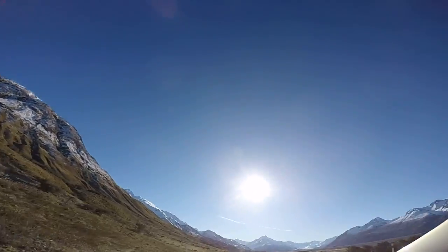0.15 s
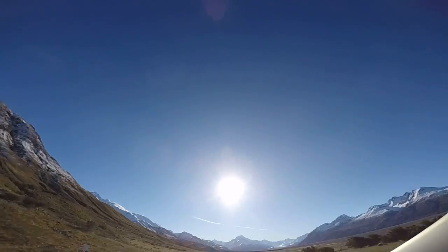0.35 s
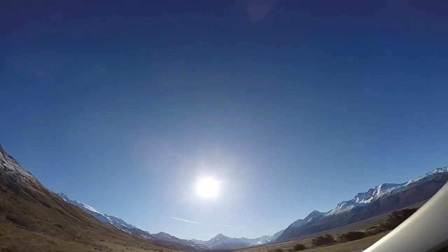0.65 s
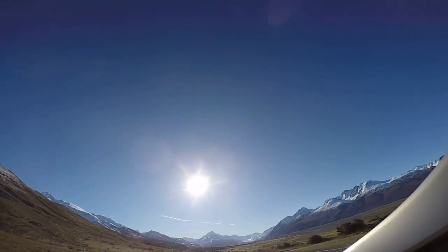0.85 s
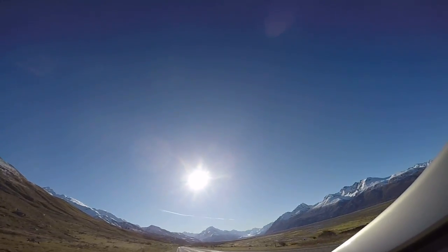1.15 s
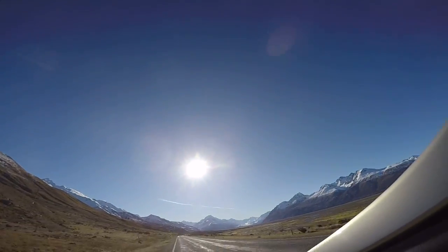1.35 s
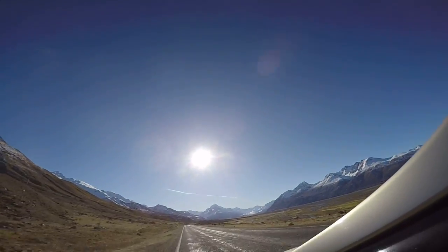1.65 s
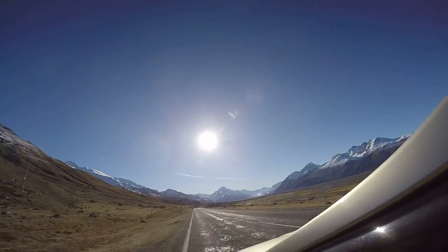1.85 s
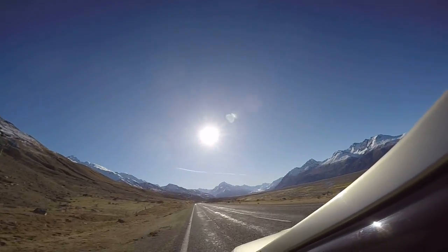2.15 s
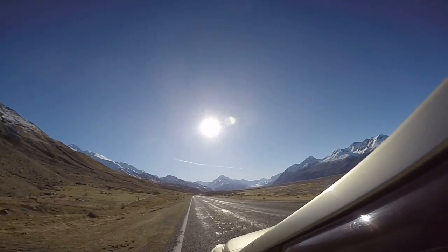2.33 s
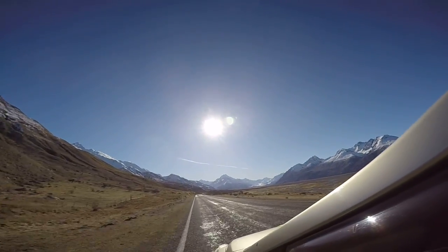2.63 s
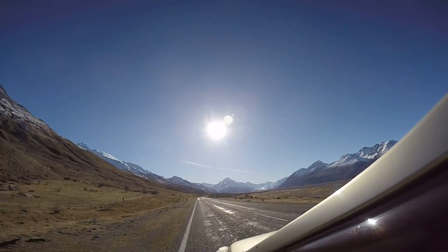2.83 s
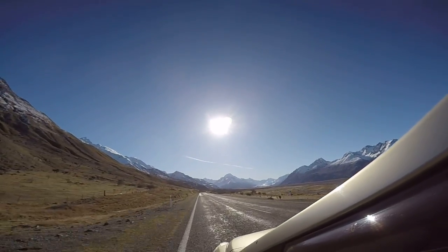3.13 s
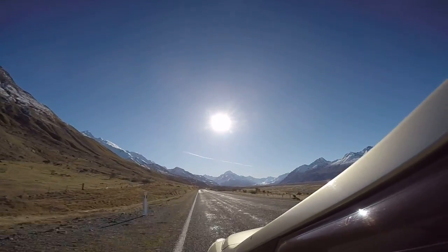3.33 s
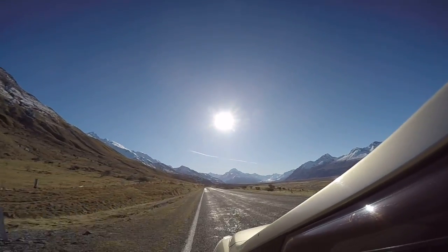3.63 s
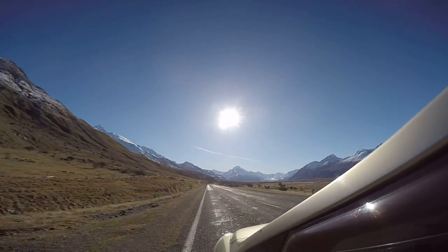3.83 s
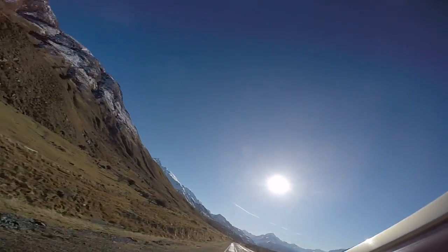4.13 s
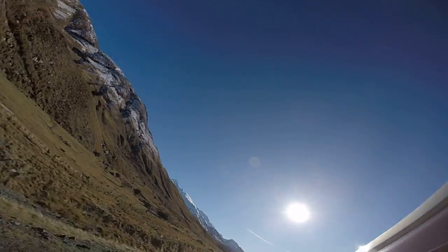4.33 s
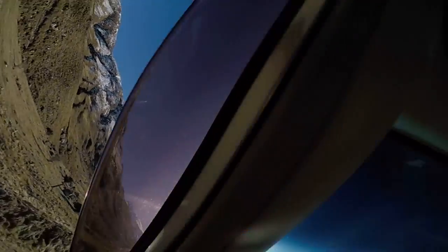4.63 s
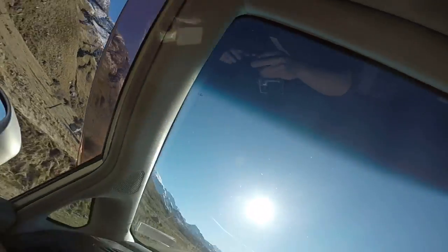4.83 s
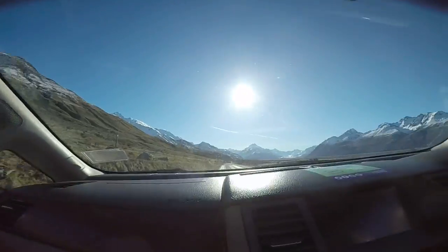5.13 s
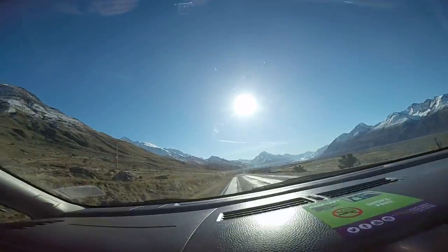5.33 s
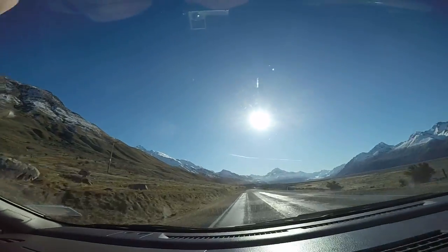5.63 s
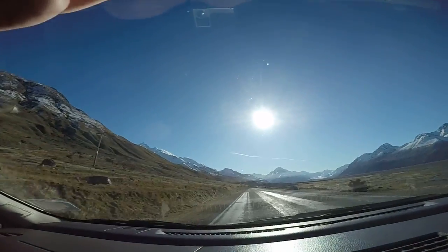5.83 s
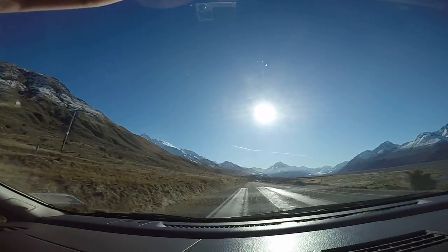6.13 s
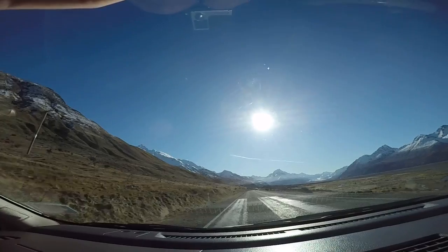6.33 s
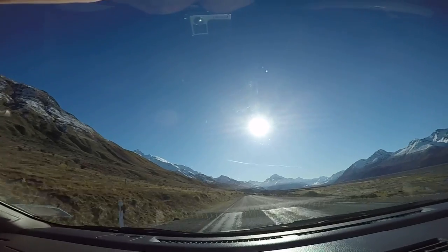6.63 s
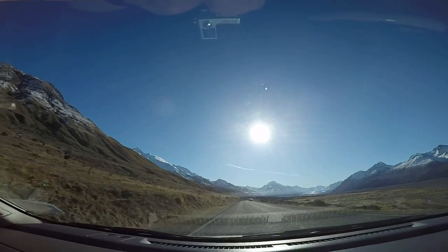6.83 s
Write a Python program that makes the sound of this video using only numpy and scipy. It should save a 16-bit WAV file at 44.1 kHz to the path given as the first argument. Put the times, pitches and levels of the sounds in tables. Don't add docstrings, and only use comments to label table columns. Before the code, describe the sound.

From 0 to 4.5 seconds, strong wind strikes a small microphone outside a moving car. It swells within the first half second into deep, uneven buffeting, a fluttering low-mid roar and a hiss coloured by the plastic housing, with faint airy fizz on top. Hard, short thumps land around 0.45, 0.8, 1.0, 1.65, 1.95 and 2.4. The wind eases near 4.15, then a heavy low slap hits at 4.37 with quick scuffs against the window frame until 4.5. The wind collapses almost instantly. Inside, it is far quieter: a lumpy body boom and dull tyre rumble, slowly lifted, with a very thin rush. Small plastic creaks come at 4.7, a hard snap at 4.94, more creaks around 5.7 to 5.85 and 6.3, stronger knocks at 6.8 to 6.87, and a soft deep thud just before 7.

```python
import sys
import numpy as np
from scipy import signal
from scipy.fft import rfft, irfft, next_fast_len
from scipy.io import wavfile
from scipy.ndimage import uniform_filter1d

SR = 44100
rng = np.random.default_rng(int(sys.argv[2]) if len(sys.argv) > 2 else 0)


def undo_db(level):
    steps = np.asarray(level, float) / 20
    return 10 ** steps


def generate_wav(sig):
    pcm = np.round(np.clip(np.atleast_2d(sig).T, -1, 1) * 32767).astype(np.int16)
    wavfile.write(sys.argv[1], SR, pcm)


N = 307377
SIZE = next_fast_len(N)
HZ = np.fft.rfftfreq(SIZE, 1 / SR)


def evened(x):
    return x / np.sqrt(np.mean(x ** 2) + 1e-20)


def filtered(x, gain):
    return irfft(rfft(x, SIZE) * gain, SIZE)[:N]


def tilted(x, tilt_db, split_hz, order=4):
    low = filtered(x, 1 / (1 + (HZ / split_hz) ** order))
    return low * undo_db(-tilt_db) + (x - low) * undo_db(tilt_db)


def steadied(x, share, seconds):
    power = uniform_filter1d(x ** 2, size=int(seconds * SR))
    return evened(x / (abs(power) + 0.02) ** (share / 2))


def curve(rows):
    s, *columns = np.transpose(rows)
    return [np.interp(np.arange(N) / SR, s, c) for c in columns]


def swells(rows):
    t = np.arange(N) / SR
    return sum(db * np.exp(-((t - s) / half_s) ** 2) for s, db, half_s in rows)


def drift(top_hz):
    shape = (HZ > 2) / np.sqrt(HZ + 1) / (1 + (HZ / top_hz) ** 4)
    return evened(filtered(rng.standard_normal(N), shape))


def slope(points):
    f, db = np.transpose(points)
    return lambda hz: undo_db(np.interp(np.log(hz + 1), np.log(f + 1), db, -120, -120))


def peaks(modes):
    def gain(hz):
        return np.sqrt(sum(undo_db(2 * db) / (1 + (2 * (hz - f) / width_hz) ** 2) ** 1.17
                           for f, width_hz, db in modes))
    return gain


def turbulence(colour, patchy_db, size):
    frames, bins = 4 * N // size + 5, size // 2 + 1
    a, b, patches = rng.standard_normal((frames, bins, 3)).T
    patches = uniform_filter1d(patches, size=5, axis=0)
    patches = evened(uniform_filter1d(patches, size=8, axis=1))
    spectra = (a + 1j * b) * undo_db(patchy_db * patches)
    x = signal.istft(spectra, nperseg=size, noverlap=3 * size // 4)[1][:N]
    return evened(filtered(x, colour(HZ)))


def add(mix, s, db, sound):
    part = mix[round(s * SR):][:len(sound)]
    part += undo_db(db) * (sound / abs(sound).max())[:len(part)]


# (time [s], port pressure [dB], housing speed [dB],
# turn of lens side into stream [-1..1])
STREAM = [(0.0, -27, -46, 1), (0.16, -20, -41, 0.084), (0.34, -21, -38.5, .4), (0.45, -14, -37.5, 0.52),
          (0.9, -15, -35.5, 0.73), (1.47, -14.5, -33, 0.52), (1.75, -15, -32.5, .3),
          (2.05, -14, -32.5, -0.46), (2.5, -14.5, -35, -0.24), (3.02, -13.5, -32.5, -.3),
          (3.25, -14.5, -34.5, -0.42), (3.55, -15, -34, -.4), (3.9, -14.5, -35, -.3),
          (4.15, -20.5, -39.5, -.1), (4.33, -16.5, -40, .5), (4.39, -11, -44, 0.087),
          (4.45, -12.5, -41, -.6), (4.52, -15.5, -46, -0.12)]
# (time [s], level [dB], half length [s])
GUSTS = [(.2, 2, .02), (.24, 1, 0.029), (.87, -2.5, 0.024), (1.94, 2, .04), (2.32, 6, 0.041),
         (2.54, -5.5, 0.029), (2.94, 6.5, 0.024), (2.98, -7, 0.027), (3.49, -1, 0.042), (3.99, 4, .04),
         (4.14, -7, 0.028), (4.3, 4, 0.17), (4.46, 3, 0.028)]
# (time [s], level [dB], half length [s])
WHISTLES = [
    (1.9, 3, 0.34),
    (3.0, 1, .15),
    (4.33, 2, .06),
    (4.46, -6.5, 0.068),
]
# (frequency [Hz], density [dB/Hz])
BUFFET = [(8.8, -40), (15, -3), (43, 0.5), (81, -1), (160, -14), (210, -49), (350, -120)]
# (frequency [Hz], density [dB/Hz])
ROAR = [(59, -17), (100, -9.5), (151, -4), (320, -1.5), (395, -2.5), (478, -6.5), (873, -29), (1100, -31),
        (1430, -46.5), (2420, -120)]
# (frequency [Hz], width [Hz], level [dB])
HOUSING = [(1100, 640, 1), (1900, 340, -3), (2430, 490, 2.5), (2950, 420, 0.5), (3645, 410, -0.5),
           (4700, 740, -4), (5520, 1040, -10.5), (6860, 690, -10)]
# (frequency [Hz], width [Hz], level [dB])
EDGE = [(9590, 1200, -2.5), (10980, 1500, -5.5), (12500, 1200, -3.5), (13600, 2500, -4)]


def wind():
    pull_s, pull_db_per_s, hiss_loss_db_per_s, fizz_loss_db_per_s = 4.51, -180, -125, -135
    fade_in_s, fade_in_db = 0.039, -26
    breakup_s, breakup_rise_s, breakup_db = 4.3, 0.1, 1.2
    t = np.arange(N) / SR
    pressure_db, speed_db, turn = curve(STREAM)
    away_s = np.maximum(t - pull_s, 0)

    start_db = fade_in_db * np.maximum(1 - t / fade_in_s, 0)
    buffet_db = -14 + start_db + swells(GUSTS) + pull_db_per_s * away_s
    roar_db = pressure_db + pull_db_per_s * away_s
    tilt_db = -0.9 + 0.14 * (pressure_db + 15.5)
    hiss_db = speed_db + hiss_loss_db_per_s * away_s
    fizz_db = -50.5 + 0.44 * (speed_db + 33.5) + turn + swells(WHISTLES) + fizz_loss_db_per_s * away_s
    flap_db = breakup_db * np.clip((t - breakup_s) / breakup_rise_s, 0, 1) * np.exp(-away_s / 0.08)

    gust, flutter = drift(90), drift(150)
    flaps = evened(flutter - uniform_filter1d(flutter, size=1500))
    buffet = steadied(turbulence(slope(BUFFET), 0.075, size=2048), 0.3, 0.054)
    roar = turbulence(slope(ROAR), 0.27, size=1024) * undo_db(1.46 * gust + 1.2 * buffet)
    hiss = turbulence(peaks(HOUSING), 0.45, size=256)
    hiss = hiss * undo_db(0.36 * gust + 0.43 * flutter + flap_db * flaps)
    fizz = turbulence(peaks(EDGE), 0.68, size=256) * undo_db(0.6 * flutter + 0.58 * drift(70))

    layers = undo_db(buffet_db) * buffet
    layers = layers + undo_db(roar_db) * tilted(evened(roar), tilt_db, 285)
    layers = layers + undo_db(hiss_db) * tilted(evened(hiss), 3.5 * turn, 3530)
    return layers + undo_db(fizz_db) * evened(fizz)


# (time [s], peak [dB], ring [Hz])
SLAPS = [
    (0.13, -28.5, 490),
    (0.45, -14, 537),
    (0.793, -11, 576),
    (0.878, -26.5, 474),
    (1.014, -12, 516),
    (1.642, -14, 533),
    (1.951, -14.5, 536),
    (2.431, -16, 545),
    (2.695, -20.5, 611),
         (4.2715, -14, 480),
    (4.368, -6, 430),
]


def slaps():
    out, t = np.zeros(N), np.arange(2048) / SR
    envelope = (1 - np.exp(-t / 0.00069)) * np.exp(-t / 0.0022)
    for s, db, hz in SLAPS:
        add(out, s, db + 0.5, np.sin(2 * np.pi * hz * t) * envelope)
    return out


# (time [s], peak [dB], pitch [Hz], ring length factor)
CREAKS = [(4.691, -37.5, 2100, 1.1), (4.691, -33, 775, 1.1), (4.701, -45, 2200, 1.1),
          (4.704, -37, 900, 1.2), (4.911, -52, 2200, 1), (4.924, -48, 1960, 1.1), (5.706, -35, 1900, 1.1),
          (5.706, -37, 950, 1.3), (5.715, -45, 2200, 1), (5.716, -35, 895, 1.1), (5.724, -37, 1200, 1.2),
          (5.735, -40, 850, 2), (5.750, -39, 900, 1.5), (5.849, -43, 1800, 1.1), (5.866, -45, 1900, 1.1),
          (6.2845, -41, 1200, 1.1), (6.404, -46, 900, 1.1), (6.758, -40, 2500, 1.1),
          (6.816, -31, 2200, 1.1), (6.8175, -20, 646, 0.65), (6.8198, -35, 2000, 1.1),
          (6.847, -21.5, 780, 1.2), (6.848, -33, 2950, 1.2), (6.869, -31.5, 1900, 1.1),
          (6.8702, -35.5, 1350, 1.1), (6.8705, -23.5, 900, 1.2)]
# (frequency [Hz], level [dB], t60 [s])
CASE = [(616, 11, 0.021), (800, 3.5, 0.031), (1000, 8.5, 0.011), (1320, 2, 0.014), (1760, 3, 0.014),
        (2140, 3, 0.012), (2600, 2, 0.012), (3020, -6, .015), (3600, -1, .012)]


def creaks():
    out, t = np.zeros(N), np.arange(2048) / SR
    dull_tap = (6.2835, -30, 700, 1.6)
    for s, db, centre_hz, length in CREAKS + [dull_tap]:
        ring = np.zeros(len(t))
        for k, (hz, mode_db, t60_s) in enumerate(CASE):
            fade_db = mode_db - 24 * np.log2(hz / centre_hz) ** 2 - 60 * t / t60_s / length
            ring += (-1) ** k * undo_db(fade_db) * np.sin(2 * np.pi * hz * t)
        add(out, s, db, ring * (1 - np.exp(-t / 0.00047)))
    return out


# (time [s], peak [dB], treble loss [dB/octave])
CLICK = [
    (4.936, -31.5, -3),
    (4.9383, -26, 7.5),
]
# (frequency [Hz], level [dB], t60 [s])
CATCH = [(500, -6, 0.027), (703, -9, 0.08), (1050, 0, .01), (1900, 3, 0.017), (1850, -31, .3),
         (1900, -34, .4), (2700, -8, .01), (3520, 2, 0.008), (4300, -13, .01), (4880, -4, .01),
         (6300, -14, .008), (7300, -21, .008), (8600, -20, .008), (11500, -28, .008)]


def catch():
    out, t = np.zeros(N), np.arange(8192) / SR
    for s, db, loss_db in CLICK:
        ring = np.zeros(len(t))
        for k, (hz, mode_db, t60_s) in enumerate(CATCH):
            fade_db = mode_db - loss_db * np.log2(hz / 2500) - 60 * t / t60_s
            ring += (-1) ** k * undo_db(fade_db) * np.sin(2 * np.pi * hz * t)
        add(out, s, db, ring * (1 - np.exp(-t / 0.00089)))
    return out


# (time [s], peak [dB], centre [Hz], length [s])
BRUSHES = [
    (4.267, -31, 800, 0.0044),
    (4.365, -29, 800, 0.0041),
    (4.422, -35, 1500, .004),
    (4.445, -32, 1800, .004),
    (4.446, -40, 4500, .004),
    (4.462, -29, 1500, .005),
    (4.487, -27, 1400, .006),
    (4.516, -35, 1400, .012),
    (4.952, -59, 6800, .012),
]


def brushes():
    out, t = np.zeros(N), np.arange(2048) / SR
    chance = rng.standard_normal((len(BRUSHES), 2048))
    for (s, db, centre_hz, length_s), draws in zip(BRUSHES, chance):
        grain = np.sin(2 * np.pi * centre_hz * t[:128]) * np.exp(-t[:128] / 0.00075)
        puff = draws * t / length_s * np.exp(-2 * t / length_s)
        add(out, s, db, np.convolve(puff, grain))
    return out


# (time [s], level [dB], half length [s])
BUMPS = [(4.57, 13.5, 0.074), (4.99, 5, .05), (5.15, -1, 0.037), (5.21, 3.5, .02), (5.45, 4.5, 0.034),
         (5.56, -3.5, .03), (5.68, -4.5, 0.033), (5.95, -0.5, .05), (6.06, 3, .03), (6.14, -6.5, 0.042),
         (6.24, 5.5, 0.037), (6.3, -4, .03), (6.46, 1.5, 0.046), (6.52, -7, 0.022), (6.63, 4.5, 0.039),
         (6.79, -6, 0.04), (6.87, 2, .03)]
# (time [s], brightness [dB], half length [s])
COARSE = [
    (4.7, 4.5, .15),
    (5.0, -1.5, 0.21),
    (5.75, 0, 0.18),
    (6.2, 1.5, 0.12),
    (6.55, -1, 0.12),
]
# (frequency [Hz], density [dB/Hz])
BOOM = [(5.9, -36), (10, -4), (22, -7.5), (37, 4.5), (71, -16), (92, -28.5), (120, -21), (160, -41),
        (260, -120)]
# (frequency [Hz], density [dB/Hz])
TYRES = [(50, -32), (85, 4.5), (96, -1), (174, -5), (199, -6), (232, -10), (355, -7), (822, -34),
         (1170, -35.5), (1440, -48), (1700, -52.5), (2210, -82), (3740, -120)]
# (frequency [Hz], density [dB/Hz])
RUSH = [(820, -35), (1400, -9), (2020, -8), (2670, -3), (3040, -3.5), (3360, -10.5), (3860, -5),
        (4220, -8.5), (5100, -10.5), (5920, -15), (7080, -16.5), (8630, -24), (10300, -22.5), (14300, -25),
        (15100, -24)]


def cabin():
    inside_s, lift_from_s, lift_db_per_s = 4.55, 4.797, 7.5
    t = np.arange(N) / SR
    lift_db = lift_db_per_s * np.maximum(t - lift_from_s, 0)
    build_db = np.minimum(2.25 * lift_db, 14)
    boom_db = -31 + build_db + 0.2 * lift_db + swells(BUMPS)
    tyre_db = -38.5 + 0.73 * lift_db + 0.29 * build_db
    grain_db = -3 + 0.22 * lift_db + swells(COARSE)
    rush_db = -69 + 1.04 * lift_db

    bumps = drift(30)
    boom = steadied(turbulence(slope(BOOM), 0.1, size=2048), 0.58, 0.08)
    tyres = turbulence(slope(TYRES), 0.67, size=1024) * undo_db(0.97 * bumps)
    rush = turbulence(slope(RUSH), 0.85, size=256) * undo_db(0.48 * bumps + 0.53 * drift(150))
    lost_db = np.clip(4.0 * (rush_db + 63.0) + 6.0 * drift(12), -16, 0)
    rush = tilted(evened(rush), lost_db, 13000, order=40) * undo_db(lost_db)

    layers = undo_db(boom_db) * boom + undo_db(tyre_db) * tilted(evened(tyres), grain_db, 220)
    entry = undo_db(-430 * np.maximum(inside_s - t, 0))
    return (layers + undo_db(rush_db) * rush) * entry


def last_swing():
    time_s, peak_db, hz = 6.962, -15.5, 41
    t = np.arange(N) / SR - time_s
    return -undo_db(peak_db) * np.sin(2 * np.pi * hz * np.clip(t, 0, 0.5 / hz)) ** 2


def scene():
    return (wind() + slaps() + creaks() + catch() + brushes() + cabin() + last_swing())[None]


def low_pass(x):
    return signal.sosfilt(signal.butter(12, 15210, fs=SR, output="sos"), x)


def record(dry):
    ceiling, knee = 0.95, 6.8
    limited = dry / (1 + abs(dry / ceiling) ** knee) ** (1 / knee)
    return low_pass(limited)


dry = scene()
out = record(dry)
generate_wav(out)
```